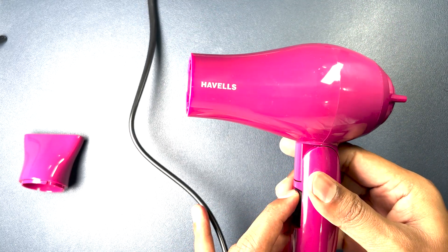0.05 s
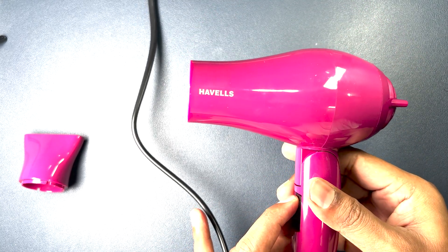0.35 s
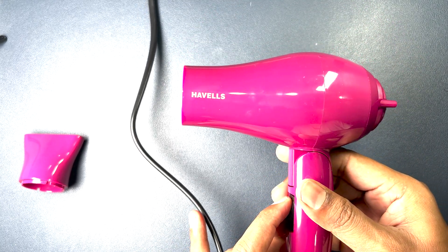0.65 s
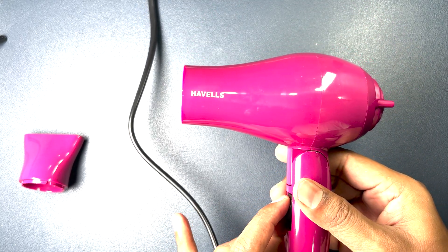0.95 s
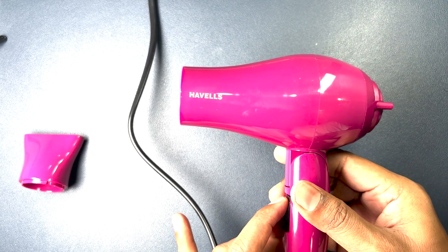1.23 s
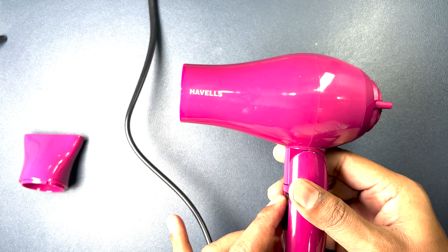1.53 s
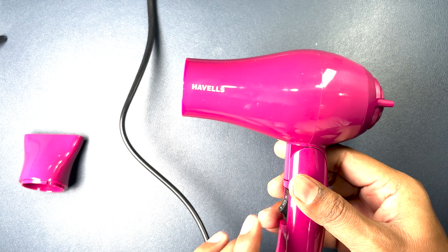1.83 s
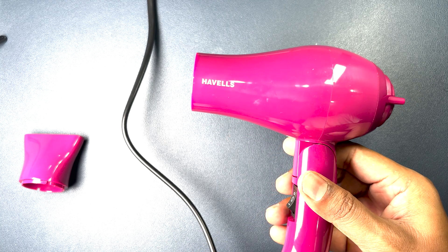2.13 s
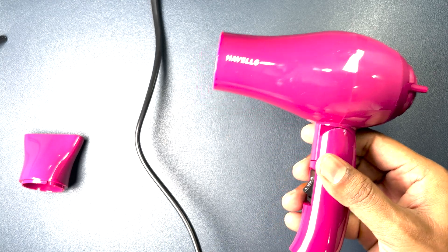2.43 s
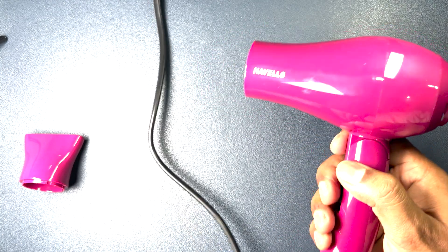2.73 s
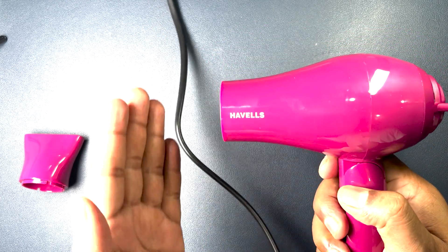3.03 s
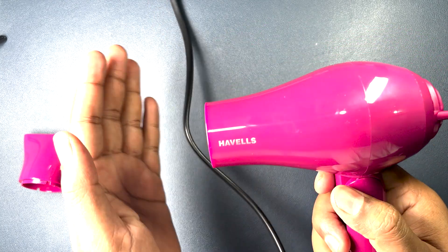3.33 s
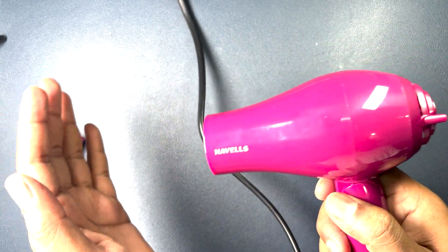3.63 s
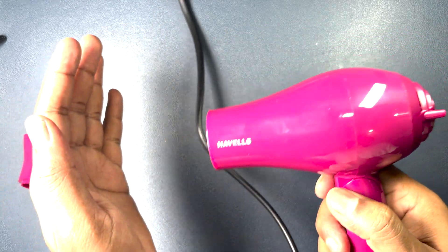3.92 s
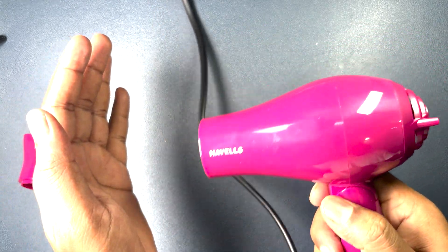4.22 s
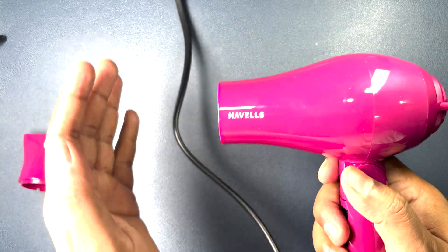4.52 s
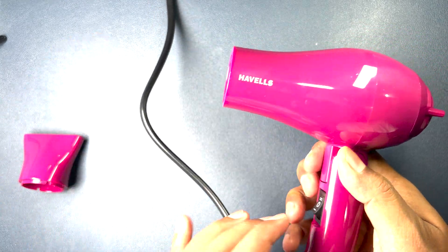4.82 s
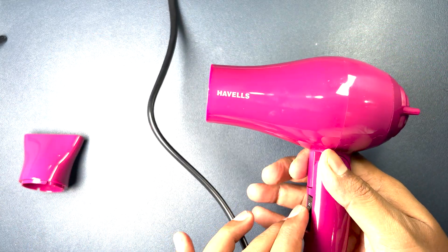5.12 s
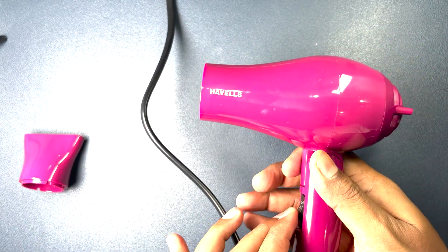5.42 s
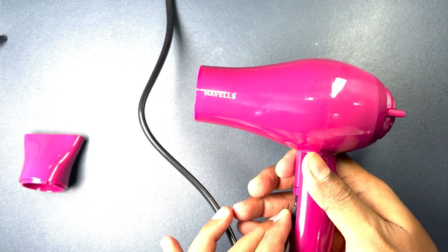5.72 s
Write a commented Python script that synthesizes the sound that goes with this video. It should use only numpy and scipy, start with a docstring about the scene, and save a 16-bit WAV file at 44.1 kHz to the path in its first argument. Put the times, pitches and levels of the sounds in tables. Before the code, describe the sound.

Close to the microphone in a quiet room, a hand-held hair dryer rises in pitch and loudness, then settles into an even rush of air with a thin, fluttering motor whine. The tone of the air shifts as it blows against a palm, with a few faint hollow whistles as it moves. It keeps blowing to the end, hissing slightly more as it is lowered toward a desk.

```python
"""A small hair dryer spins up and runs steadily, hand-held just above a desk, heard close and in mono.
Air rushes through its plastic barrel, the eight-blade fan whines, and the motor's brushes scrape
and add thin overtones. Midway it is drawn back and aimed at an open palm, which shifts the colour
of the rush; at the end it is lowered toward the desk. The room rumbles faintly underneath."""
import sys
import numpy as np
from scipy import signal
from scipy.fft import rfft, irfft, next_fast_len
from scipy.io import wavfile
from scipy.ndimage import uniform_filter1d, map_coordinates

SR = 44100
rng = np.random.default_rng(int(sys.argv[2]) if len(sys.argv) > 2 else 0)


def wrap_up_sound(samples):
    """Save the sound to the file named by the first command line argument, as 16-bit audio."""
    columns = np.atleast_2d(samples).T
    # keep every value between -1 and 1, then stretch to whole-number steps
    tamed = np.clip(columns, -1, 1)
    steps = np.round(tamed * 32767).astype(np.int16)
    wavfile.write(sys.argv[1], SR, steps)


N = 258426
TIME_S = np.arange(N) / SR


def amp(db):
    """Decibels to gain."""
    return 10 ** (np.asarray(db) / 20)


def unit(x):
    """Scale to rms 1."""
    return x / np.sqrt(np.mean(x ** 2) + 1e-20)


def curves(rows):
    """One value per sample for each column after the time."""
    times_s, *columns = np.transpose(rows)
    return [np.interp(TIME_S, times_s, column) for column in columns]


def wobble(rate_hz):
    """Smooth random curve, rate_hz knots a second."""
    knots = rng.standard_normal(int(N * rate_hz / SR) + 4)
    return map_coordinates(knots, [TIME_S * rate_hz])


def swell(peak_s, half_s):
    """Gaussian rise and fall of height 1."""
    return np.exp(-((TIME_S - peak_s) / half_s) ** 2)


def bell(hz, centre_hz, width_hz):
    """Resonance curve of height 1."""
    return 1 / (1 + (2 * (hz - centre_hz) / width_hz) ** 2)


def filtered(x, response):
    """Apply a gain given as a function of frequency in Hz."""
    size = next_fast_len(N + SR // 4)
    hz = np.fft.rfftfreq(size, 1 / SR)
    return irfft(rfft(x, size) * response(hz), size)[..., :N]


def ring(centre_hz, width_hz):
    """Noise of rms 1 in one resonance."""
    return unit(filtered(rng.standard_normal(N), lambda hz: bell(hz, centre_hz, width_hz)))


def turbulence(spectrum, patchy_db):
    """Shaped noise of rms 1 with slowly drifting patches."""
    bins = signal.stft(rng.standard_normal(N), nperseg=1024)[2]
    patches = uniform_filter1d(rng.standard_normal(bins.shape), size=5, axis=0)
    patches = uniform_filter1d(patches, size=60, axis=1)
    noise = signal.istft(bins * amp(patchy_db * unit(patches)), nperseg=1024)[1][:N]
    knots_hz, knots_db = np.transpose(spectrum)
    return unit(filtered(noise, lambda hz: amp(np.interp(np.log1p(hz), np.log1p(knots_hz), knots_db))))


# Dryer pose: (time [s], aim at palm [0-1], lowering toward desk [0-1])
POSE = [(2.3, 0, 0.15), (2.7, 1, 0), (4.9, 0.99, 0.04), (5.55, 0.3, 0.81), (5.86, 0.1, 0.92)]

def pose():
    """Aim and lowering, each 0-1 per sample."""
    return np.clip(curves(POSE), 0, 1)


START_HZ, RUN_HZ, RUN_UP_TAU_S, LOWERED_RISE_HZ = 198, 371, 0.277, 2

def shaft_rate():
    """Turns per second: the motor runs up, wanders slightly and gains a little when lowered."""
    _, lowered = pose()
    run_up_hz = RUN_HZ - (RUN_HZ - START_HZ) * np.exp(-TIME_S / RUN_UP_TAU_S)
    return (run_up_hz + LOWERED_RISE_HZ * lowered) * (1 + 0.0005 * wobble(2))


def flow_gain(speed, db, power, palm_db, lowered_db):
    """Flow noise grows with a power of fan speed (1 = run up) and shifts with the pose."""
    aim, lowered = pose()
    return amp(db + palm_db * aim + lowered_db * lowered) * speed ** power


# Motor can modes: (centre [Hz], width [Hz], initial level [dB], fade [dB/s])
CAN_MODES = [(5780, 890, -56, 11), (7160, 820, -55, 1), (9250, 800, -51, 0.5)]

def brush_scrape():
    """The brushes ring the motor can, hardest while the starting current is high."""
    return sum(amp(db - fade_db_per_s * TIME_S) * ring(hz, width_hz)
               for hz, width_hz, db, fade_db_per_s in CAN_MODES)


# Spectra of barrel roar, grille hiss, fine fizz: (frequency [Hz], relative level [dB])
BARREL_SPECTRUM = [(240, -69), (400, -50.5), (597, -35.5), (794, -15.5), (1080, -9), (1390, -10.5),
                   (1850, -11.5), (2290, -2.5), (2720, -6.5), (3020, -3.5), (3130, -4.5), (3900, -10.5),
                   (5070, -20), (8580, -120)]
HISS_SPECTRUM = [(2240, -40), (3800, 0), (5390, -2), (7010, -5), (7500, -23), (9750, -72), (16500, -120)]
FIZZ_SPECTRUM = [(4410, -37), (7500, -1.5), (11100, -2.5), (11700, -4.5), (15100, -10.5), (15800, -9.5)]
# Air path peaks and dips: (centre [Hz], width [Hz], gain blowing freely [dB], gain at palm [dB])
AIR_PATH = [(646, 27, 4, 8), (916, 78, 4.5, 2), (1120, 98, -2.5, 3.5), (1240, 63, 1.5, 4),
            (1370, 57, -2, -11.5), (1694, 110, 2, 4.5), (2033, 91, 4, 0.5), (2156, 89, -6, 0),
            (2285, 100, 0, 2), (2483, 150, 4.5, -4.5), (2660, 230, -5, -0.5), (3080, 83, 4.5, 0.5),
            (3370, 110, 2.5, 2), (3520, 180, 3.5, -2.5), (3840, 290, -7.5, -5.5), (4300, 340, -2, -2),
            (6260, 340, 5.5, 1)]

def air_rush(speed):
    """The flow roars in the barrel and hisses at the grille; aiming the nozzle shifts its resonances."""
    barrel = turbulence(BARREL_SPECTRUM, patchy_db=0.96)
    hiss = turbulence(HISS_SPECTRUM, patchy_db=2.07)
    fizz = turbulence(FIZZ_SPECTRUM, patchy_db=1.75)
    flow = barrel * flow_gain(speed, db=-37.5, power=2.5, palm_db=-1.5, lowered_db=0.1)
    flow += hiss * flow_gain(speed, db=-40.5, power=4.5, palm_db=-0.74, lowered_db=1)
    flow += fizz * flow_gain(speed, db=-40, power=2.5, palm_db=0, lowered_db=1.3)
    free = filtered(flow, lambda hz: amp(sum(db * bell(hz, fc, bw) for fc, bw, db, _ in AIR_PATH)))
    aimed = filtered(flow, lambda hz: amp(sum(db * bell(hz, fc, bw) for fc, bw, _, db in AIR_PATH)))
    aim, _ = pose()
    return (1 - aim) * free + aim * aimed


BEAM_HZ, BEAM_WIDTH_HZ, BEAM_TONE_BOOST_DB, BEAM_HISS_DB = 6500, 800, 14, -47.5

def grille_beam():
    """The grille beams a band of hiss at the listener, stronger as the dryer is lowered."""
    _, lowered = pose()
    return amp(BEAM_HISS_DB) * lowered * ring(BEAM_HZ, BEAM_WIDTH_HZ)


# Desk reflection: (time [s], delay [ms], gain [ratio])
DESK_ECHO = [(0, .38, 0.13), (3.6, .39, 0.12), (4.1, .37, 0.18), (5.2, 0.368, 0.16), (5.5, .3, 0.04)]

def over_desk(x):
    """The desk returns a copy whose delay follows the dryer's position."""
    delay_ms, gain = curves(DESK_ECHO)
    echo = map_coordinates(x, [np.arange(N) - delay_ms * SR / 1000])
    return (x + gain * echo) / np.sqrt(1 + gain ** 2)


def scattered(x, gain, drift_ms, count):
    """Hands and nearby things return weak copies; delays drift, faster at the palm, so the hiss swishes."""
    aim, _ = pose()
    travel = np.cumsum(0.226 + 0.56 * aim) / SR
    delays_ms = np.geomspace(1.2, 14, count) * rng.uniform(.9, 1.1, count)
    out = x.copy()
    for delay_ms in delays_ms:
        drift = map_coordinates(rng.standard_normal(16), [travel], mode="mirror")
        read_at = np.arange(N) - (delay_ms + drift_ms * drift) * SR / 1000
        out += gain * rng.choice([-1, 1]) * map_coordinates(x, [read_at])
    return out / np.sqrt(1 + count * gain ** 2)


# Room spectrum: (frequency [Hz], relative level [dB])
ROOM_SPECTRUM = [(12, -30), (20, 2), (38, 1.5), (70, -3), (172, -17.5), (299, -15.5), (334, -15.5),
                 (368, -16), (400, -11.5), (550, -11.5), (720, -20), (1210, -120)]

def room_rumble():
    """A faint low rumble fills the room."""
    return amp(-73.5 + 1.2 * wobble(10)) * turbulence(ROOM_SPECTRUM, patchy_db=0.4)


# Blade tone, beamed unevenly as the dryer speeds up and moves: (time [s], level [dB])
BLADE_LEVEL = [(0.0, -75.5), (0.18, -54.1), (0.24, -46.1), (0.33, -45.5), (0.42, -58.3), (0.69, -45.6),
               (0.8, -52.3), (0.86, -38.1), (1.0, -42.1), (1.08, -47.4), (1.6, -40.9), (2.1, -43.4),
               (2.45, -50.2), (2.8, -41.7), (2.95, -49.7), (3.2, -40.7), (3.42, -43.1), (5.86, -41.7)]
# Brush tones (five clicks a turn) and weak rotor overtones:
# (shaft order, level blowing freely [dB], level at palm [dB])
BRUSH_TONES = [(15, -54.5, -52.5), (20, -55, -57), (25, -62, -61), (30, -56, -57)]
ROTOR_TONES = [(1, -92, -86), (4, -67, -64), (5, -57, -63), (6, -61, -58), (9, -58, -58), (14, -66, -59),
               (16, -66, -61), (17, -64, -63), (18, -64, -62), (21, -68, -60), (22, -63, -60),
               (24, -62, -62), (35, -66, -65)]
# Brief overtone flares: (time [s], half length [s], shaft order, level [dB])
FLARES = [(.11, .04, 24, -58), (.19, .05, 20, -55), (.19, .045, 25, -50.5), (.255, .06, 30, -47.5),
          (.7, .16, 25, -55), (3.42, .17, 21, -53), (4.1, .3, 30, -60)]

def whine(shaft_hz, power, wander_db):
    """Blade, brush and rotor tones are multiples of the slightly unsteady shaft speed."""
    aim, lowered = pose()
    shaft_rad = 2 * np.pi * np.cumsum(shaft_hz * (1 + .0002 * wobble(25))) / SR

    def tone(order, flutter_db=2.2):
        """One shaft order, fluttering in the turbulent air, boosted within the grille's beam."""
        beam_db = BEAM_TONE_BOOST_DB * lowered * bell(order * shaft_hz, BEAM_HZ, BEAM_WIDTH_HZ)
        sine = np.sin(order * shaft_rad + rng.uniform(0, 2 * np.pi))
        return amp(beam_db) * unit(sine * amp(flutter_db * wobble(20)))

    blade_db, = curves(BLADE_LEVEL)
    out = amp(blade_db) * tone(order=8, flutter_db=1)
    run_up_gain = (shaft_hz / RUN_HZ) ** power
    for order, free_db, aimed_db in BRUSH_TONES + ROTOR_TONES:
        steady = run_up_gain * amp(free_db + (aimed_db - free_db) * aim + wander_db * wobble(3.03))
        flares = sum(amp(db) * swell(peak_s, half_s)
                     for peak_s, half_s, flare_order, db in FLARES if flare_order == order)
        out += (steady + flares) * tone(order)
    return out


def swirl(speed, centre_hz, width_hz):
    """Eddies in the barrel sound a breathy note that rises a little with the flow."""
    phase_rad = 2 * np.pi * np.cumsum(centre_hz * (.83 + .17 * speed ** 4)) / SR
    eddies = filtered(rng.standard_normal((2, N)), lambda hz: bell(hz, 0, width_hz))
    note = unit(eddies[0] * np.cos(phase_rad) + eddies[1] * np.sin(phase_rad))
    boost_db = 5 * swell(peak_s=2.22, half_s=0.33)  # just before the turn to the palm
    return flow_gain(speed, db=-51.5, power=2.5, palm_db=-5, lowered_db=-3) * amp(boost_db) * note


# Hollow whistles: (time [s], half length [s], centre [Hz], width [Hz], level [dB])
WHISTLES = [(2.76, .15, 7650, 500, -46), (3.149, 0.14, 9900, 1800, -46), (4.848, .13, 2321, 90, -44),
            (4.87, .13, 11200, 450, -51), (5.25, 0.29, 4400, 400, -48), (5.3, 0.11, 2330, 90, -43)]

def whistles():
    """Narrow bands of the rush swell and fade as the dryer moves."""
    return sum(amp(db) * swell(peak_s, half_s) * ring(hz, width_hz)
               for peak_s, half_s, hz, width_hz, db in WHISTLES)


def scene():
    """Dryer and room, alike in both channels."""
    shaft_hz = shaft_rate()
    speed = shaft_hz / RUN_HZ
    air = over_desk(air_rush(speed) + grille_beam())
    air = scattered(air, gain=.1, drift_ms=.15, count=8)
    notes = swirl(speed, centre_hz=1091, width_hz=48) + whistles()
    motor = whine(shaft_hz, power=9, wander_db=1.4) + brush_scrape()
    mono = air + notes + motor + room_rumble()
    return np.array([mono, mono])


CUTOFF_HZ = 15750

def record(dry):
    """Brick-wall low-pass."""
    return filtered(dry, lambda hz: hz < CUTOFF_HZ)


dry = scene()
out = record(dry)
wrap_up_sound(out)
```